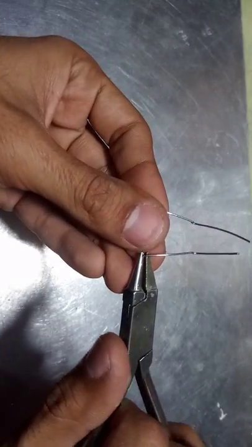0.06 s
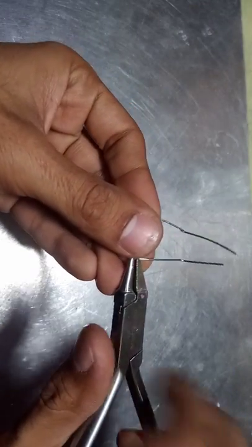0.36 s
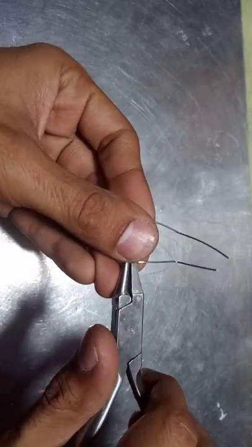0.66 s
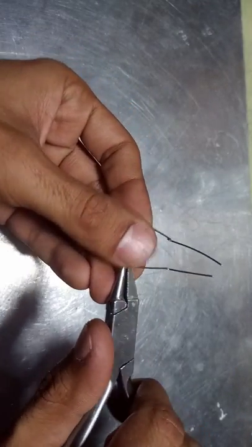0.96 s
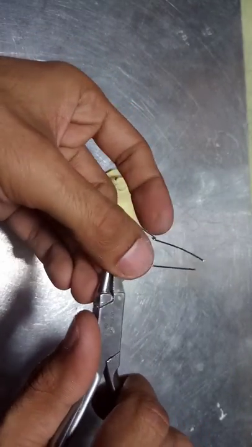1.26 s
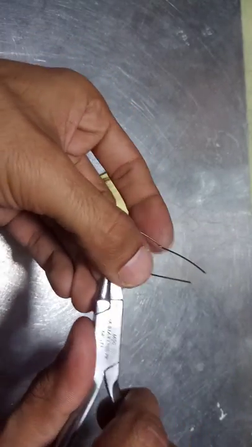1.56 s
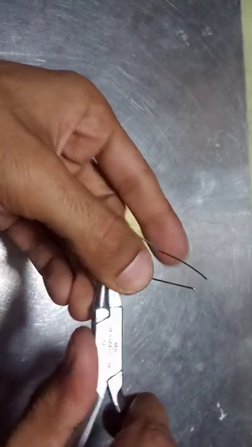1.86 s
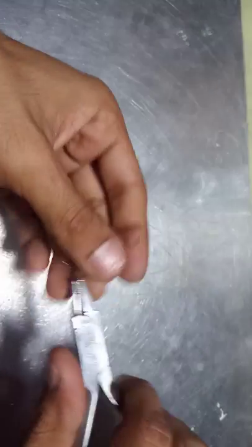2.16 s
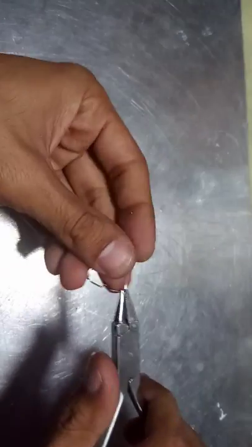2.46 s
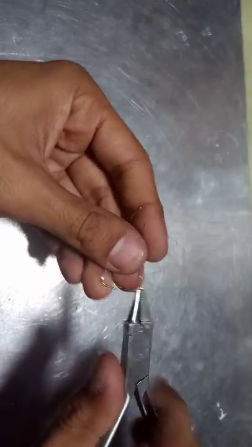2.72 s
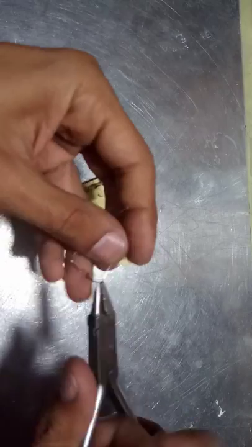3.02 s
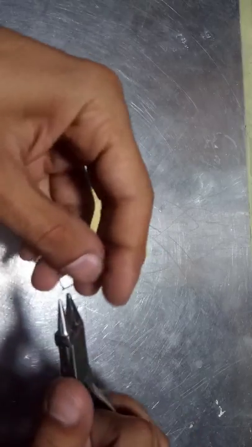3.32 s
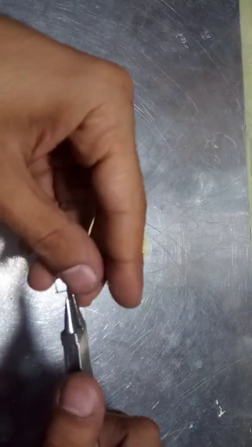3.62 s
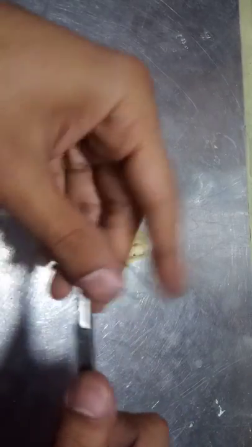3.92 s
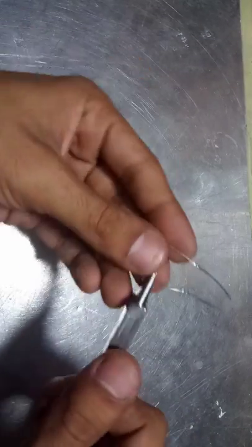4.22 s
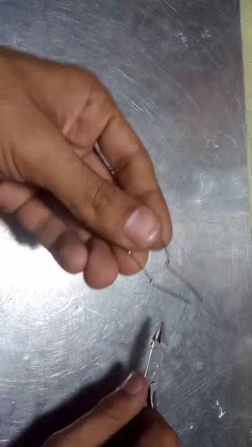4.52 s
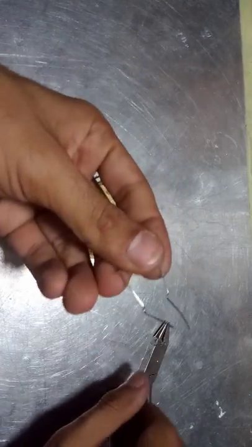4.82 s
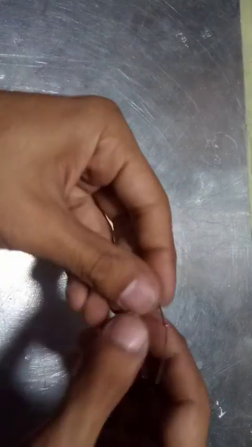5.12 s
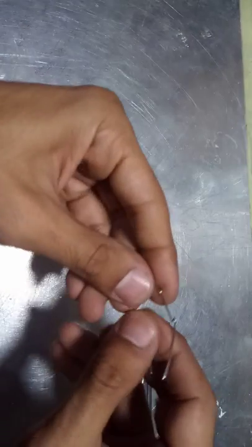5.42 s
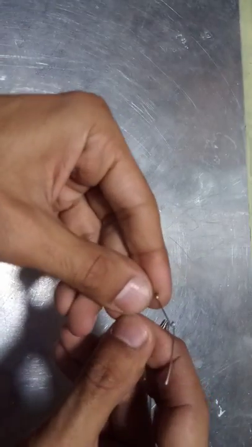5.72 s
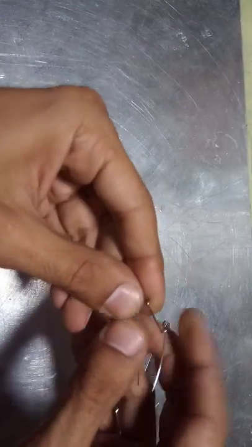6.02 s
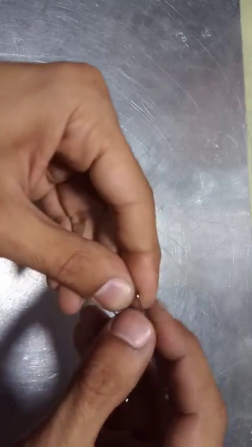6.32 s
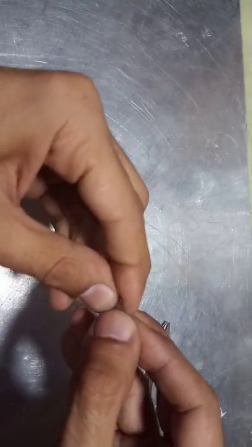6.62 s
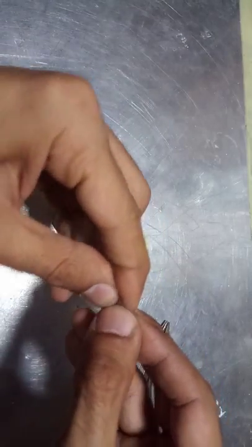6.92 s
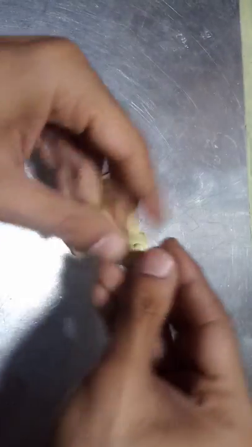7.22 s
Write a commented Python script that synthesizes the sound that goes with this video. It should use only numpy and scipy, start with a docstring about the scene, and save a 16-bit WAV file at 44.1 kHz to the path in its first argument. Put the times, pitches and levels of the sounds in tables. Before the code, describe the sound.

Small steel pliers bend a thin wire close to the microphone, giving sparse, sharp metallic ticks with faint rubbing of fingers. About halfway through, a quick cluster of loud knocks makes the metal bench ring and the room boom briefly. Near the end, something is set down, slides with a short swish and bumps to a stop. Low ventilation hums throughout in a quiet, bare lab.

```python
"""Small, sharp ticks sound close by in a quiet, bare lab: steel pliers bend a thin wire, which sticks
and slips in the jaws while fingers rub faintly. Something hard knocks on the metal bench below; its
modes ring and the room booms. Later a thing is set down, slid along with a swish and bumped to a stop.
Ventilation hums underneath, and the limiter of a nearby phone ducks the loud knocks."""
import sys
import numpy as np
from scipy import signal
from scipy.fft import rfft, irfft, next_fast_len
from scipy.io import wavfile
from scipy.ndimage import uniform_filter1d, minimum_filter1d

SR = 44100
rng = np.random.default_rng(int(sys.argv[2]) if len(sys.argv) > 2 else 0)


def master_out(mix):
    """Clip the mix to full scale and print it as 16-bit PCM to the path in sys.argv[1]."""
    frames = np.transpose(np.atleast_2d(mix))
    ceiling = np.clip(frames, -1, 1)
    pcm = np.round(ceiling * 32767).astype(np.int16)
    wavfile.write(sys.argv[1], SR, pcm)


N = 324854
TIME, FREQ = np.arange(N) / SR, np.fft.rfftfreq(N, 1 / SR)

# slips of the wire: t/s, level/dB, second catch/dB, decay time/s, slipping leg f/Hz, other leg f/Hz,
# ping/dB, microphone port ring/dB, left minus right/dB
SLIPS = [(0.0802, -38, -22, 0.0028, 2240, 9350, 8, 1, -5.5),
         (1.5248, -60.5, -20, 0.0011, 4300, 5400, 10, 1, -9),
         (1.5654, -46, 8, 0.0019, 5250, 2570, 15, 7, -5.5),
         (2.003, -70, -5, 0.0022, 2900, 4170, 17, -5, -4),
         (2.0562, -46.5, -4.5, 0.0016, 10700, 2240, 8, 16, -4),
         (2.432, -69, -7, .003, 2660, 4300, 13, 15, -4),
         (2.604, -54.5, -24, 0.0011, 10940, 4380, 14, 19, -8), (3.039, -62, -9, 0.002, 6450, 4900, 6, 1, 1),
         (3.4595, -63, 1, 0.011, 9300, 2650, 3, 0, -1), (3.4766, -38.5, -3, 0.0038, 4470, 2700, 7.5, 5, -2),
         (3.4925, -45.5, 0, .004, 4462, 2620, 9, 4, 1),
         (3.711, -33, -4.5, .0022, 2630, 10940, 6.5, 1.5, -6.5)]
# resonances of pliers and wire: f/Hz, bandwidth/Hz, level/dB
PLIER_MODES = [(2970, 500, 0), (3980, 390, 0), (5590, 630, 4), (7020, 470, 4), (9250, 1400, 0),
               (11000, 830, -1)]
# blows on the bench: t/s, level/dB, contact corner f/Hz, thud/dB, boom/dB, room and sheet/dB,
# ring of the dragged thing (0-1)
BLOWS = [(3.813, -1.5, 18100, 1, 6.5, -3.5, 0.1), (3.8189, 4, 14400, 1, -2, 2, 0),
         (3.85, -8.5, 12030, -15, 4, -3, 0.2), (3.961, 8, 18160, 5, 2, -2.5, 0),
         (3.9825, -14, 9030, -4.5, -11.5, -17, 0.1), (6.7031, -19.5, 8930, 7, -4.5, -3, 0.88),
         (6.781, -32.5, 5500, -11, 8, 7.5, .8), (6.9969, -24, 4110, 9, -5.5, -6, 1),
         (7.0309, -29.5, 3930, 8.5, 1, -6, 0.4), (7.052, -44, 16100, 16, 13, -5, .3)]
# spectrum of a blow: f/Hz, level/dB
BLOW_SPECTRUM = [(20, -45.5), (45, -34), (70, -11.5), (150, 1.5), (330, -4), (650, -8.5), (950, -5.5),
                 (1400, 2.5), (2000, -7.5), (2500, -6), (3100, -9), (4200, -9), (6500, -12.5),
                 (9000, -20.5), (13500, -21), (15000, -12.5)]
# low modes of the bench: f/Hz, level/dB, T60/s
BENCH_MODES = [(87, -15, 0.39), (111.3, -7.5, 0.47), (138.4, -3, .52), (166.4, -3, 0.46),
               (191.4, -3.5, .66), (223.2, -8.5, .5), (301.7, -14.5, 0.1), (351, -16.5, 0.45),
               (453.7, -13.5, 0.54)]
# modes of the bench's metal sheet: f/Hz, level/dB, T60/s
SHEET_MODES = [(820, -8, 0.75), (1153, -1.5, .35), (1257, -3.5, 0.33), (1474, 1.5, .42), (1595, -3.5, .4),
               (1620, 0, 0.53), (1725, -5.5, 0.53), (2470, -6, 0.28), (3480, -9.5, .62), (3750, -4.5, 0.35),
               (4150, -5.5, 0.22)]
# shoves along the bench: t/s, duration/s, level/dB
SHOVE_EVENTS = [(6.619, 0.16, -62), (6.716, .2, -49.5), (6.797, 0.42, -69.5)]
# spectrum of sliding friction: f/Hz, level/dB
SWISH_SPECTRUM = [(100, -19), (450, -14), (720, -9.5), (1100, -8.5), (1800, -8), (2500, -9.5), (3600, -6.5),
                  (6200, -9.5), (8500, -18), (13500, -20), (15000, -12.5)]
# resonances of the dragged thing: f/Hz, bandwidth/Hz, lift/dB
OBJECT_MODES = [(347, 80, 9.5), (1090.6, 100, 4.5), (1496, 91, 4), (2110, 110, 6.5), (2514, 300, 10),
                (4100, 400, 4.5), (6465, 430, 4)]
# weight settling on the bench: t/s, time under load/s, level/dB
LOAD_EVENTS = [(6.691, 0.1, -46.5), (6.97, 0.283, -53)]
# spectrum of the bench's rumble: f/Hz, level/dB
RUMBLE_SPECTRUM = [(25, -38.5), (60, 1), (115, 4.5), (170, 4.5), (260, -45), (800, -58)]
# fingers on wire and handles: peak t/s, half duration/s, hiss/dB, dull rub/dB, dull rub f/Hz
FINGER_RUBS = [(0.452, .09, -100, -76, 70), (0.992, 0.036, -95, -65.5, 84), (2.3, 0.04, -76.5, -80, 300),
               (2.58, 0.069, -85, -66.5, 360), (2.8, 0.085, -87, -65, 396), (3.52, 0.031, -77, -60.5, 135),
               (4.623, 0.035, -101.5, -63, 142), (5.884, 0.036, -97.5, -64.5, 420),
               (5.801, .2, -88.5, -81, 100.1), (6.298, 0.092, -87, -71.5, 69.8),
               (6.488, .02, -98.5, -62.5, 75), (6.63, 0.074, -84.5, -65.5, 70.6),
               (7.236, 0.039, -89, -67, 395)]
# spectrum of skin on steel: f/Hz, level/dB
SKIN_SPECTRUM = [(800, -18), (2800, 3), (5000, 5), (8000, -10), (13000, -8), (15000, -2)]
# reverberation bands: f/Hz, level/dB, T60/s
ROOM_BANDS = [(60.3, 6.5, 0.73), (154, -1, 0.55), (394, 2.5, 0.52), (804, 0, .44), (1580, -0.5, 0.54),
              (3167, 1.5, 0.48), (6297, 2.5, .37), (10015, 2, 0.37), (15000, 1.5, 0.24)]
# spectrum of the background air: f/Hz, level/dB
AIR_SPECTRUM = [(20, -25), (40, -22.5), (65, 0.5), (130, -2), (260, -9), (380, -8), (580, -18),
                (1000, -16.5), (2000, -22), (3500, -27), (6000, -28), (8500, -35.5), (13000, -36),
                (15200, -31.5)]
# room resonances driven by the air: f/Hz, bandwidth/Hz, lift/dB
ROOM_MODES = [(187, 14, 7), (442.2, 86, 6.4), (795, 160, 9)]
# direct sound at the two microphones: f/Hz, correlation
DIRECT_COHERENCE = [(100, 0.97), (400, 0.96), (1400, 0.65), (3000, 0.14), (7000, 0.16), (15000, .05)]
# echoes at the two microphones: f/Hz, correlation
ECHO_COHERENCE = [(50, 0.97), (150, 0.87), (380, 0.54), (700, 1), (1400, 0), (3000, 0)]
# steady noise at the two microphones: f/Hz, correlation
STEADY_COHERENCE = [(50, 1), (200, .89), (380, .9), (700, 0.72), (1400, 0.066)]


def wire_ticks(creep_s=0.0045, creep_db=-16, catch_gap_s=0.0036, echo_db=-23, echo_s=0.016):
    """Stick-slip friction: two bursts of tiny catches ring the pliers; release plucks the wire's legs."""
    size, low_cut_hz, ping_width_hz, other_leg_db = 4096, 1200, 130, -6.5
    out, t, f = np.zeros((2, N)), TIME[:size], np.fft.rfftfreq(size, 1 / SR)
    body = sum((-1) ** k * undb(db) * resonance(f, hz, width)
               for k, (hz, width, db) in enumerate(PLIER_MODES))
    radiation = resonance(f, low_cut_hz, low_cut_hz) * 1j * f / low_cut_hz  # small parts radiate no bass
    creep = np.where(t < creep_s, undb(creep_db) * t / creep_s, 1)
    bench_echo = undb(echo_db) * np.exp(-(t - creep_s) / echo_s) * (t > creep_s)
    for s, db, second_db, fade_s, leg_hz, other_hz, ping_db, port_db, pan_db in SLIPS:
        # the wire creeps, lets go and catches once more; a short echo off the bench follows
        slip = creep * np.exp(-np.maximum(t - creep_s, 0) / fade_s)
        grip = np.hypot(slip, undb(second_db) * np.interp(t - catch_gap_s, t, slip))
        catches = rfft(stereo_noise(size, DIRECT_COHERENCE) * np.hypot(grip, bench_echo))
        pluck = undb(ping_db) * np.linalg.norm(grip) * np.exp(-2j * np.pi * f * creep_s)
        leg = resonance(f, leg_hz, ping_width_hz)
        other_leg = undb(other_leg_db) * resonance(f, other_hz, ping_width_hz)
        # the microphone port adds a thin ring of its own, stronger on the right
        mic_port_ring = undb(port_db) * pan(db=-4) * resonance(f, hz=14900, width_hz=550)
        tick = irfft(radiation * (catches * (body + mic_port_ring) + pluck * (leg + other_leg)))
        add(out, s - creep_s, undb(db) * pan(pan_db) * tick)
    return out


def bench_knocks(size=4096, clatter_db=-1, push_db=9, thud_hz=450):
    """Impact excitation: a push and a brief clatter set the bench's modes ringing; the room answers."""
    direct, to_room = np.zeros((2, 2, N))
    t, f = TIME[:size], np.fft.rfftfreq(size, 1 / SR)
    bass = 1 / (1 + (f / thud_hz) ** 4)
    push, bass_cut = undb(push_db) * minimum_phase(6 * bass), minimum_phase(-24 * bass)
    boom = undb(-29.5) * ringing(BENCH_MODES, swell_s=0.036)
    sheet = undb(-45.5) * ringing(SHEET_MODES, swell_s=0.0026)
    for s, db, contact_hz, thud_db, boom_db, room_db, ring in BLOWS:
        # a softer contact clatters longer and loses treble; a heavier thing adds thud
        clatter_s = 0.0031 * (10016 / contact_hz) ** 0.2
        treble_loss_db = 10 * np.log10(1 + (f / contact_hz) ** 4)
        colour_db = curve(BLOW_SPECTRUM, f) + ring * lift(OBJECT_MODES, f) + thud_db * bass
        blow = undb(db) * minimum_phase(colour_db - treble_loss_db)
        clatter = undb(clatter_db) * rfft(stereo_noise(size, DIRECT_COHERENCE) * np.exp(-t / clatter_s))
        add(direct, s, pan(db=-1.5) * irfft(blow * (clatter * bass_cut - push)))
        add(direct, s, undb(db) * (undb(boom_db) * boom + undb(room_db) * sheet))
        add(to_room, s, undb(room_db + push_db) * 2 * irfft(blow))
    return direct + undb(-3.5) * pan(db=-1) * reverberation(to_room, build_s=0.004)


def sliding_object(grain_db=1.5):
    """Sliding friction: each shove makes a grainy swish; the bench rumbles where the weight settles."""
    sliding = sum(undb(db) * shove(s, length_s) for s, length_s, db in SHOVE_EVENTS)
    loading = sum(undb(db) * load(s, hold_s) for s, hold_s, db in LOAD_EVENTS)
    friction = hiss(curve(SWISH_SPECTRUM) + lift(OBJECT_MODES) + ripple(FREQ))
    swish = friction * sliding * undb(grain_db * wander(rate_hz=180))
    rumble = hiss(curve(RUMBLE_SPECTRUM)) * loading
    return swish * pan(db=-4) + rumble


def shove(start_s, length_s, speed_power=1.44):
    """Friction noise grows as a power of speed, which here rises and falls in half a sine."""
    speed = np.sin(np.pi * np.clip((TIME - start_s) / length_s, 0, 1))
    return abs(speed) ** speed_power


def load(start_s, hold_s, attack_s=0.024, sag_db_per_s=33, release_s=0.032):
    """Envelope of forced vibration: it swells, sags while the weight settles, then dies away."""
    age = np.maximum(TIME - start_s, 0)
    release = np.exp(-np.maximum(age - hold_s, 0) / release_s)
    return np.minimum(age / attack_s, 1) * undb(-sag_db_per_s * age) * release


def finger_rubs(grain_db=4):
    """Friction of skin on steel gives a faint hiss and a dull rub as the grip changes."""
    skin = hiss(curve(SKIN_SPECTRUM)) * undb(grain_db * wander(rate_hz=200)) * pan(db=-4.5)
    out = np.zeros((2, N))
    for s, half_s, hiss_db, dull_db, hz in FINGER_RUBS:
        stroke = np.exp(-((TIME - s) / half_s) ** 2)
        out += stroke * (undb(hiss_db) * skin + undb(dull_db) * narrow_noise(hz, width_hz=110))
    return out


def reverberation(x, build_s):
    """A diffuse field builds up, then decays exponentially, the treble first."""
    t, f = TIME[:SR], np.fft.rfftfreq(SR, 1 / SR)
    echoes = rfft(stereo_noise(SR, ECHO_COHERENCE)) * undb(ripple(f))
    centres = [row[0] for row in ROOM_BANDS]
    response = np.zeros((2, SR))
    for weights, (_, db, t60) in zip(np.eye(len(centres)), ROOM_BANDS):
        band = irfft(echoes * curve(list(zip(centres, weights)), f), SR)
        response += undb(db) * band * decay(t, t60)
    response *= 1 - np.exp(-(t / build_s) ** 2)
    response /= np.sqrt(np.sum(response ** 2) / 2)
    return signal.fftconvolve(x, response, axes=1)[:, :N]


def ventilation(fan_hz=190.8, fan_db=-73.5, drone_db=-75.5, throb_db=4, air_db=-69.5):
    """Broadband air noise drives room resonances, beside a wavering fan tone and a throbbing drone."""
    phase = 2 * np.pi * fan_hz * TIME + 0.35 * wander(rate_hz=3.8)
    fan = np.sin(phase) * undb(fan_db + 0.73 * wander(rate_hz=7.2))
    drone = narrow_noise(hz=436.4, width_hz=32) * undb(drone_db + throb_db * wander(rate_hz=21))
    rush = hiss(curve(AIR_SPECTRUM) + lift(ROOM_MODES)) * undb(air_db)
    return (rush + fan + drone) * pan(db=-0.2)


def ringing(modes, swell_s):
    """Modal superposition: damped partials build up and beat against each other."""
    t = TIME[:SR]
    partials = sum(undb(db) * np.sin(2 * np.pi * hz * t) * decay(t, t60) for hz, db, t60 in modes)
    return partials * (1 - np.exp(-(t / swell_s) ** 2))


def decay(t, t60):
    """Exponential damping: 60 dB lost in each T60."""
    return np.exp(-np.log(1000) * t / t60)


def resonance(f, hz, width_hz):
    """Response of a damped resonator, gain 1 at its centre."""
    return 1j * f * width_hz / (hz ** 2 - f ** 2 + 1j * f * width_hz)


def lift(modes, f=FREQ):
    """Resonances raise a spectrum around their centres (dB)."""
    return sum(db * abs(resonance(f, hz, width)) ** 2 for hz, width, db in modes)


def ripple(f, spacing_hz=55, depth_db=3):
    """Modal overlap: countless weak resonances of metal make a spectrum uneven above the bass (dB)."""
    knots = rng.standard_normal(4096)
    return depth_db * np.interp(f / spacing_hz, np.arange(len(knots)), knots) * np.minimum(f / 1200, 1)


def minimum_phase(db):
    """Causal response for a dB curve: nothing sounds before the hit."""
    cepstrum = irfft(np.log(undb(db)))
    half = len(cepstrum) // 2
    cepstrum[1:half] *= 2
    cepstrum[half + 1:] = 0
    return np.exp(rfft(cepstrum))


def stereo_noise(size, coherence):
    """Spatial coherence: white noise at two microphones, alike in the bass and hardly so in the treble."""
    correlation = np.clip(curve(coherence, np.fft.rfftfreq(size, 1 / SR)), -1, 1)
    mid, side = rfft(rng.standard_normal((2, size)))
    mid *= np.sqrt((1 + correlation) / 2)
    side *= np.sqrt((1 - correlation) / 2)
    return irfft([mid + side, mid - side], size)


def hiss(db, lag_s=0.0002):
    """Filtered noise of rms 1 that reaches the right microphone first."""
    size = next_fast_len(N, real=True)
    gain = undb(np.interp(np.fft.rfftfreq(size, 1 / SR), FREQ, db))
    x = irfft(rfft(stereo_noise(size, STEADY_COHERENCE)) * gain, size)[:, :N]
    x[0] = np.roll(x[0], int(lag_s * SR))
    return x / x.std()


def narrow_noise(hz, width_hz):
    """Two equal resonators in cascade hold noise in a steep-sided band."""
    return hiss(40 * np.log10(abs(resonance(FREQ + 1, hz, width_hz))))


def wander(rate_hz):
    """Random modulation with a standard deviation of 1."""
    step = int(SR / rate_hz)
    x = uniform_filter1d(np.repeat(rng.standard_normal(N // step + 1), step), step)[:N]
    return x / x.std()


def curve(points, f=FREQ):
    """Interpolation of (f/Hz, value) points on a log-frequency axis."""
    hz, value = np.transpose(points)
    return np.interp(np.log(f + 1), np.log(hz), value)


def undb(db):
    """Amplitude ratio for a level in dB."""
    return 10 ** (np.asarray(db) / 20)


def pan(db):
    """Channel gains for a level difference, left minus right."""
    return undb(np.array([[db], [-db]]) / 2)


def add(out, s, x):
    """Superpose a sound on both channels at time s."""
    i = int(s * SR)
    out[:, i:i + x.shape[-1]] += x[..., :N - i]


def scene():
    """Direct and diffuse sound add: close ticks are nearly dry; blows on the bench fill the room."""
    ticks = wire_ticks()
    tick_echoes = undb(-17.5) * reverberation(ticks, build_s=0.003)
    return ticks + tick_echoes + bench_knocks() + sliding_object() + finger_rubs() + ventilation()


def record(dry, ceiling_db=-19.5, release_db_per_s=125, look_s=0.0029, cutoff_hz=15900):
    """Look-ahead limiting: gain drops on loud knocks and recovers in their tails; the top is cut."""
    window = 2 * int(look_s * SR) + 1
    power = uniform_filter1d(dry ** 2, window, axis=1).max(axis=0)
    over_db = np.maximum(10 * np.log10(abs(power) + 1e-18) - ceiling_db, 0)
    recovery_db = release_db_per_s * TIME
    duck_db = recovery_db - np.maximum.accumulate(over_db + recovery_db)
    gain = undb(uniform_filter1d(minimum_filter1d(duck_db, window), window))
    lowpass = signal.ellip(8, 0.2, 70, cutoff_hz, fs=SR, output="sos")
    return signal.sosfilt(lowpass, dry * gain)


dry = scene()
out = record(dry)
master_out(out)
```